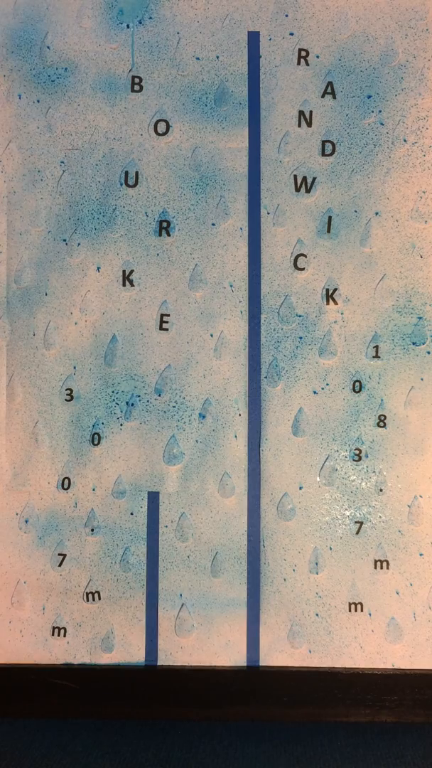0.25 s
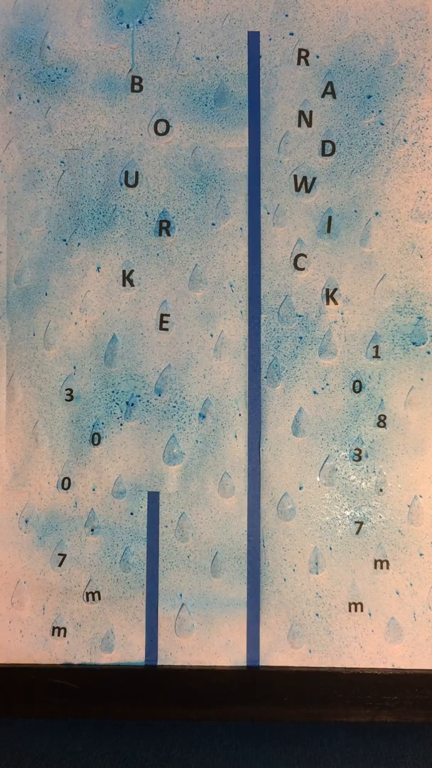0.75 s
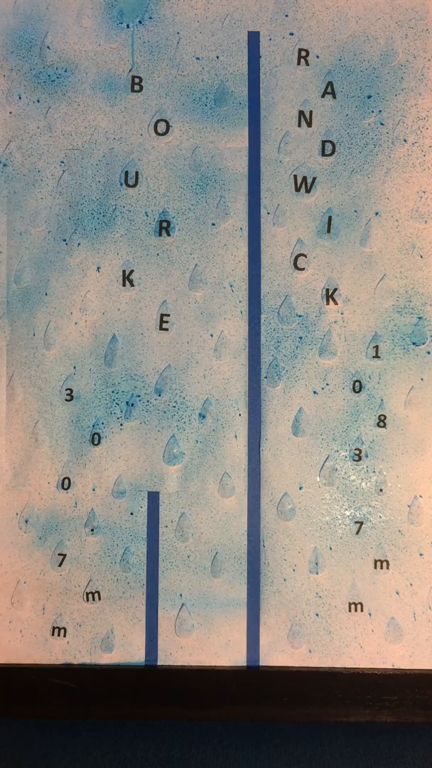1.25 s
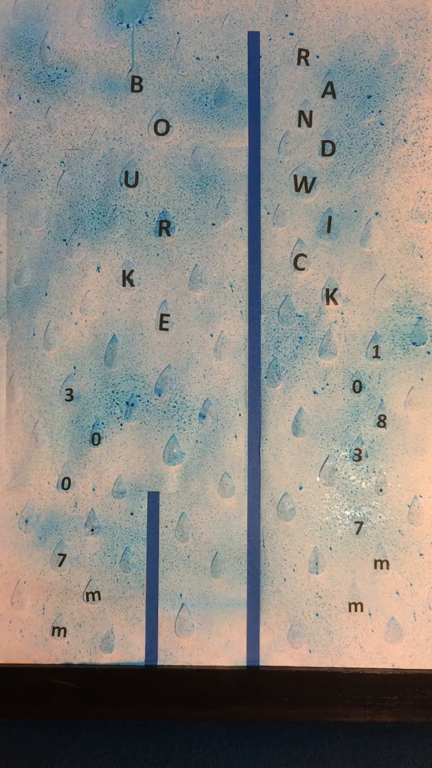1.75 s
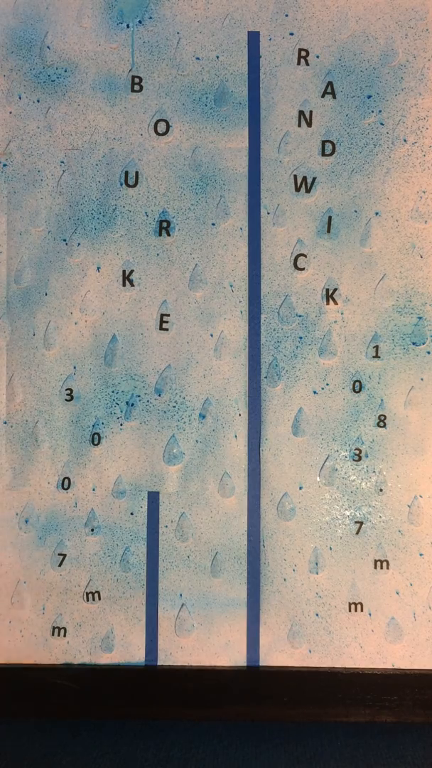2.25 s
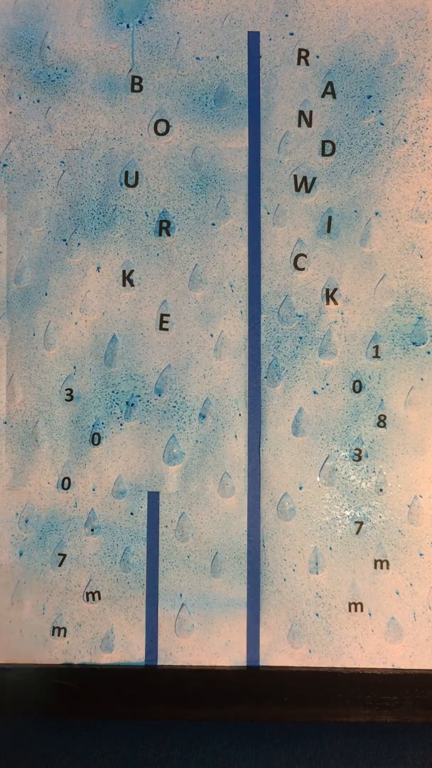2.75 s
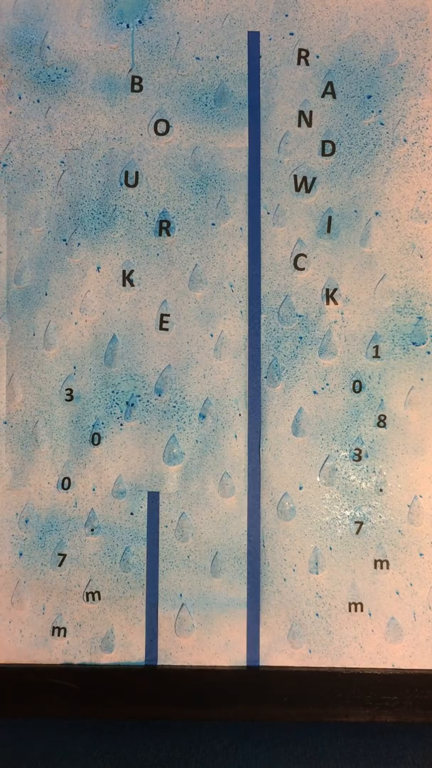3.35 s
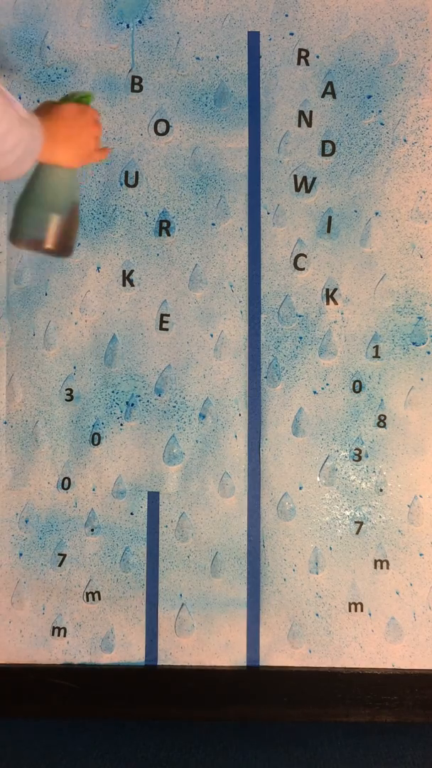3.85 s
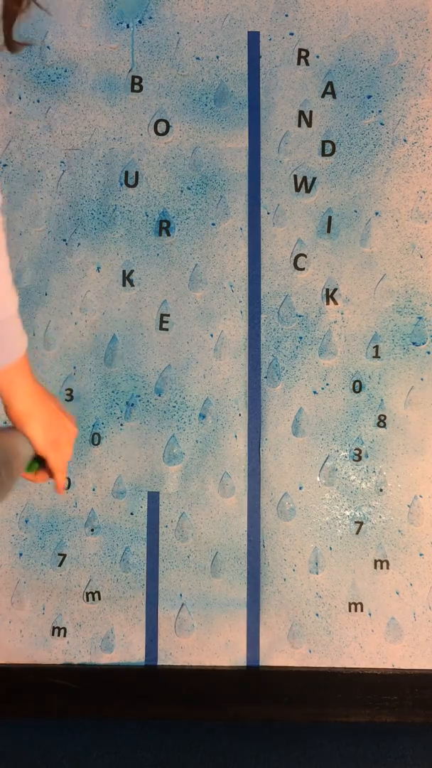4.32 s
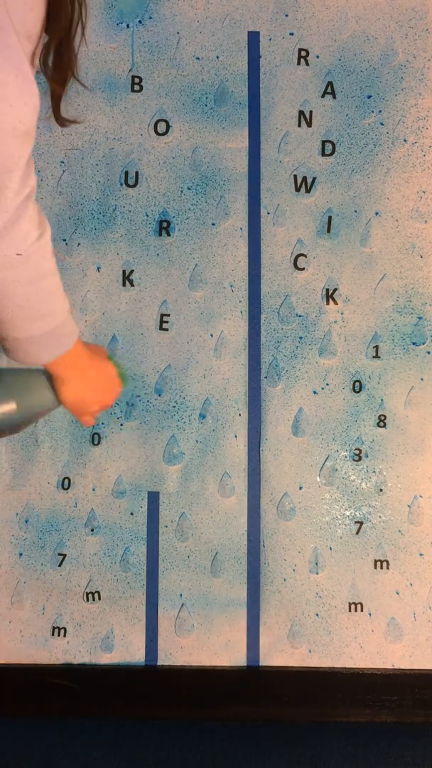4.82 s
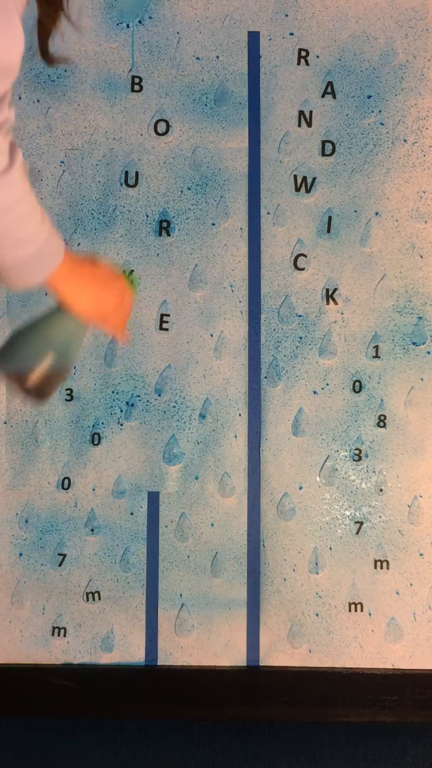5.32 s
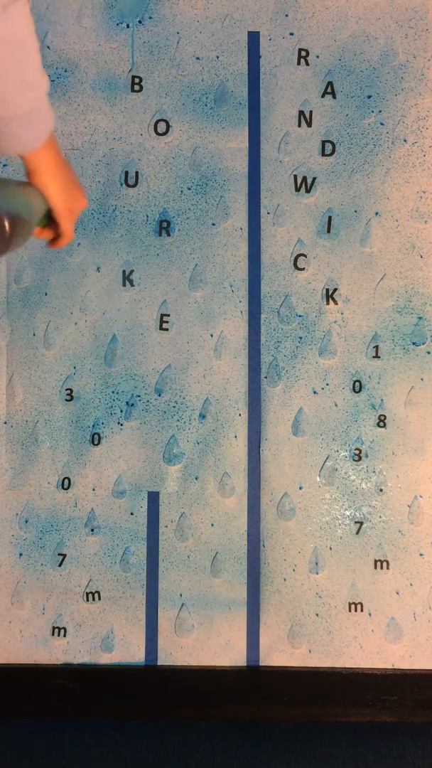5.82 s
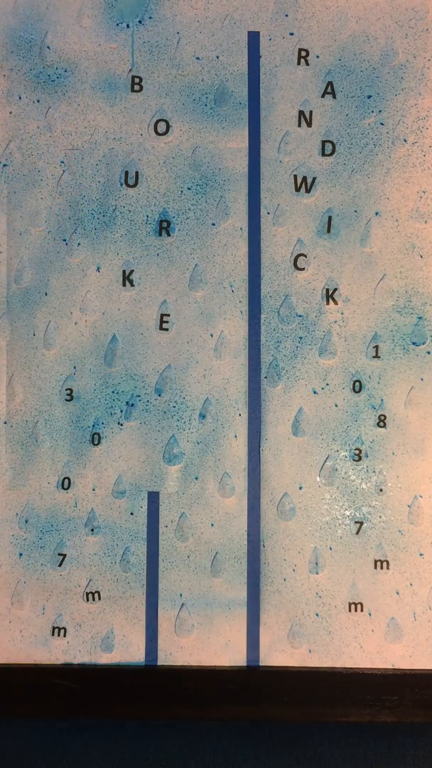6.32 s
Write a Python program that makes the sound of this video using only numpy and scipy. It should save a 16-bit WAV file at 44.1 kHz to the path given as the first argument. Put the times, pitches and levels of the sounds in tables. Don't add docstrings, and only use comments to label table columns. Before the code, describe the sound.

Eight short, unevenly spaced spray-bottle squirts hiss in a hushed room, separated by bubbly refills, trigger clacks and a rattly pause midway.

```python
import sys
import numpy as np
from scipy import signal
from scipy.io import wavfile

SR = 44100
rng = np.random.default_rng(int(sys.argv[2]) if len(sys.argv) > 2 else 0)


def wav_out(sig):
    wavfile.write(sys.argv[1], SR, np.round(np.clip(np.atleast_2d(sig).T, -1, 1) * 32767).astype(np.int16))


def rack_gain(trim_db):
    fader = np.asarray(trim_db, float)
    return 10 ** (fader / 20)


N = 289737
STEP = 40
OPEN_DB, SHUT_DB = -45.5, -45

# (valve opens t/s, fullest pressure t/s, valve shuts t/s, fullest jet level/dB,
# jump over the dribble at opening level/dB)
SQUEEZES = [
    (-0.2, -0.08, 0.004, -40, 5),
    (0.595, 0.675, 0.754, -37.5, 0.3),
    (1.283, 1.395, 1.46, -41.5, 8),
    (1.998, 2.102, 2.182, -41.5, 11),
    (2.71, 2.806, 2.872, -39, 7),
    (4.149, 4.262, 4.318, -37, 7),
    (4.984, 5.08, 5.152, -37.5, 4),
    (5.803, 5.892, 5.936, -40, 1.5),
]
# (collapse of the jet dB/s, draining froth level/dB, its fall s per 20 dB)
DRAINS = [
    (290, -60, 0.25),
    (300, -60.5, 0.6),
    (240, -58, 0.14),
    (420, -65, 0.12),
    (350, -72, 0.2),
    (430, -67, 0.3),
    (480, -60, 0.1),
    (320, -57, 0.4),
]


def squeeze():
    roundness, valve_s, dribble_db_per_s = 1.3, 0.007, 420
    t = np.arange(0, N, STEP) / SR
    level_db = -120
    for (opens, fullest, shuts, peak_db, jump_db), (die_db_per_s, *_) in zip(SQUEEZES, DRAINS):
        off = np.abs(np.interp(t, [opens, fullest, shuts], [-1, 0, 1])) ** roundness
        arch_db = peak_db + off * (np.where(t < fullest, OPEN_DB, SHUT_DB) - peak_db)
        early_s = opens - t
        leak_db = jump_db * np.clip(early_s / valve_s, 0, 1) + dribble_db_per_s * np.maximum(early_s, 0)
        collapse_db = die_db_per_s * np.maximum(t - shuts, 0)
        level_db = np.maximum(level_db, arch_db - leak_db - collapse_db)
    return level_db


def jet():
    # (f/Hz, level/dB per Hz)
    mist_colour = [(150, -51), (250, -41.5), (335, -20.5), (645, -13.5), (753, -18.5), (910, -11.5),
                   (1140, -12.5), (1530, -8), (3200, -3.5), (4930, 1.5), (9820, -1.5), (13200, -5),
                   (15400, -6.5)]
    # (f/Hz, width/Hz, level/dB)
    cavities = [(4020, 150, 3), (4900, 220, 0), (7100, 450, 1.5), (1550, 67, 2.5), (2130, 350, -0.5)]
    level_db = squeeze()
    over_db = level_db - SHUT_DB
    body_db = 7.7 - 1.1 * np.maximum(over_db, -1.5) - 0.4 * np.maximum(-56 - level_db, 0)
    patter_db = 2 - 0.8 * np.maximum(over_db, -18)
    source = rng.standard_normal((2, N)) + 0.23 * grains(per_s=5000, spread_db=0.5)
    mist = coloured(source, mist_colour, 1.2, body_db, patter_db)
    for hz, width_hz, peak_db in cavities:
        mist = mist + (rack_gain(peak_db) - 1) * resonance(mist, hz, width_hz)
    mist = mist + every_sample(rack_gain(body_db - 16.5)) * droplets(per_s=1500, cycles=20.0)
    return every_sample(rack_gain(level_db + 0.3)) * mist


def droplets(per_s, cycles):
    hits = grains(per_s, spread_db=2.5)[0]
    dealt = rng.integers(0, 16, N)
    out = 0
    for k, hz in enumerate(np.geomspace(1450, 3600, 16)):
        out = out + resonance(hits * (dealt == k) + 1e-18, hz, 1.9 * hz / cycles)
    return rms_one(out)


def spray_edges():
    # (f/Hz at the valve level, level/dB against the mist)
    edges = [(2500, -22), (3300, -21), (4100, -20), (5300, -21), (6400, -21), (7900, -23)]
    rise_per_db, wander, width_hz, spit_db = .02, .06, 260, 3.5
    level_db = squeeze()
    out = 0
    for hz, edge_db in edges:
        pitch = hz * np.exp(rise_per_db * np.maximum(level_db - SHUT_DB, -6) + wander * slow(6.0))
        phase = 2 * np.pi * np.cumsum(every_sample(pitch)) / SR
        gain = rack_gain(level_db + edge_db + spit_db * slow(22.0))
        out = out + every_sample(gain * slow(width_hz)) * np.cos(phase)
        out = out + every_sample(gain * slow(width_hz)) * np.sin(phase)
    return out


def refill():
    # (loudest t/s, level/dB, rise s per 20 dB, fall s per 20 dB, dullness/dB)
    rubs = [(0.13, -64, 0.2, 0.15, 3), (0.218, -55.5, 0.025, 0.12, 2.5), (0.53, -67.5, 0.17, 0.05, 6),
            (1.03, -63, 0.3, 0.12, 0.5), (1.25, -63, 0.11, 0.03, -4), (1.62, -66, 0.1, 0.1, 1.5),
            (1.7, -54.5, 0.12, 0.1, 0.2), (1.86, -77, 0.3, 0.2, 0.2), (1.95, -68, 0.03, 0.05, -4),
            (2.39, -62.5, 0.12, 0.2, 1.5), (3.026, -69, 0.06, 0.25, 1.5), (3.14, -68, 0.3, 0.04, 2.5),
            (3.29, -76, 0.05, 0.3, 4), (3.54, -66.5, 0.2, 0.3, 0.5), (3.8, -77, 0.4, 0.3, -4),
            (4.112, -62, 0.06, 0.1, -4), (4.4, -66, 0.1, 0.15, 0.5), (4.55, -50, 0.09, 0.09, 5.5),
            (4.68, -70, 0.03, 0.13, 0.5), (4.876, -66, 0.02, 0.4, 0.2), (5.365, -57.5, 0.12, 0.22, -2.5),
            (5.755, -63, 0.15, 0.03, -8), (6.17, -61, 0.05, 0.4, 0.2), (6.33, -60, 0.15, 0.25, 4),
            (6.44, -65, 0.3, 0.2, 8), (6.51, -65.5, 0.1, 0.12, 3)]
    # (loudest t/s, level/dB, rise s per 20 dB, fall s per 20 dB)
    shuffles = [(0.05, -66, 0.1, 0.1), (0.53, -63, 0.2, 0.1), (0.93, -65, 0.2, 0.2), (1.04, -60, 0.1, 0.2),
                (2.4, -69, 0.2, 0.2), (3.12, -70, 0.2, 0.1), (3.55, -71, 0.3, 0.2), (4.49, -63, 0.05, 0.1),
                (4.55, -53, 0.08, 0.08), (4.68, -69, 0.03, 0.1), (4.88, -66, 0.02, 0.15),
                (5.01, -59, 0.12, 0.06), (5.14, -62, 0.06, 0.06), (5.31, -68, 0.1, 0.15),
                (5.86, -64, 0.25, 0.2), (5.42, -69, 0.15, 0.2), (6.1, -66, 0.2, 0.3), (6.3, -60, 0.3, 0.3),
                (6.44, -59.5, 0.2, 0.15)]
    # (f/Hz, level/dB per Hz)
    crackle_colour = [(150, -44), (250, -7), (457, -15.5), (1310, -2.5), (1430, -1.5), (1980, -0.5),
                      (2310, -1), (5280, -1.5), (11100, -8), (15400, -15)]
    lag_s, rise_s, drain_dull_db = 0.07, 0.04, 0.1
    drains = []
    for (_, _, shuts, *_), (_, db, fall_s) in zip(SQUEEZES, DRAINS):
        drains.append((shuts + lag_s, db, rise_s, fall_s, drain_dull_db))
    rows = rubs + drains
    power = swells(rows)
    total = power.sum(axis=0)
    dull_db = np.array(rows)[:, -1] @ power / total
    low_db = 10 * np.log10(rack_gain(-14) ** 2 + swells(shuffles).sum(axis=0) / total)
    clumps = rack_gain(2.5 * drift(45))
    source = rng.standard_normal((2, N)) + 0.63 * grains(per_s=900, spread_db=1.0) * clumps
    crackle = coloured(source, crackle_colour, 1.12, dull_db, low_db + 14.5)
    return every_sample(np.sqrt(total)) * rack_gain(-1.5) * crackle


def ticks():
    # (t/s, peak level/dB, centre f/Hz)
    bubbles = [(0.153, -52, 10000), (2.3635, -52, 9500), (2.3825, -46, 6000), (2.423, -52, 10000),
               (2.43, -54, 6000), (2.438, -52, 7500), (2.4585, -53, 6000), (3.0257, -53, 8000),
               (3.06, -55, 9500), (3.134, -50, 7000), (4.8, -57, 6000), (5.329, -53, 7500),
               (5.3535, -51, 7500), (5.37, -50, 5000), (5.378, -50, 5000), (0.968, -45, 5260),
               (0.9994, -47, 10000), (1.038, -52, 4160), (1.222, -56, 5320), (1.5983, -50, 6590),
               (1.943, -46, 5450), (1.9517, -49, 5470), (2.2754, -55, 4590), (2.3242, -48, 6230),
               (2.37, -46, 8000), (2.3944, -48, 7500), (2.412, -47, 4650), (2.4672, -48.5, 4700),
               (3.0038, -45, 6200), (3.0505, -49, 9840), (3.0727, -46, 8000), (3.0857, -50, 9500),
               (3.0989, -46.5, 9670), (3.105, -51, 8000), (3.1404, -48, 10200), (4.1051, -47, 7000),
               (4.6757, -51, 4000), (4.8734, -44, 9000), (5.3095, -52, 6890), (5.4005, -47, 5120),
               (6.116, -45, 7860), (6.1719, -48, 4060), (6.2153, -44, 6800)]
    echo_s, echo_level_db = .0027, -1.5
    out, t = np.zeros(N + SR), np.arange(SR // 100) / SR
    for s, peak_db, hz in bubbles + froth(count=10):
        noise, uneven_db = rng.standard_normal(len(t)), rng.normal(0, 1.6)
        pop = resonance(noise * (np.exp(-t / 0.00015) + 0.16 * np.exp(-t / 0.0027)), hz, 1.3 * hz)
        pop = rack_gain(peak_db) * pop / np.abs(pop).max()
        for start_s, gain in ((s, 1), (s + echo_s, rack_gain(echo_level_db + uneven_db))):
            at = round(start_s * SR)
            out[at:at + len(t)] += gain * pop
    return out[:N]


def froth(count):
    # (start t/s, mean gap/s, peak level/dB, centre f/Hz)
    runs = [
        (2.358, 0.0105, -59, 6000),
        (3.03, 0.0105, -60, 6500),
    ]
    rows = []
    for start, gap_s, peak_db, hz in runs:
        gaps, sizes, pitches = rng.uniform(-1, 1, (count, 3)).T
        times = start + gap_s * np.cumsum(1 + 0.6 * gaps)
        rows += zip(times, peak_db + 5.0 * sizes, np.minimum(hz * 1.4 ** pitches, 11000))
    return rows


def knocks():
    # (t/s, peak level/dB, ring f/Hz, rattle t60/s, bright crack level/dB)
    rows = [(0.2113, -48, 1950, 0.09, -14), (0.224, -49, 2050, 0.06, -14), (0.228, -52, 3900, 0.06, -20),
            (1.6596, -47, 2450, 0.06, -6), (1.6885, -43, 2270, 0.032, -18), (1.6965, -42, 2450, 0.05, -12),
            (1.7136, -46, 2000, 0.06, -15), (1.9895, -39, 2250, 0.09, -25), (2.278, -56, 2900, 0.06, -10),
            (2.7075, -39, 2400, 0.07, -25), (3.2725, -56, 2140, 0.08, -4), (4.122, -47, 2600, 0.046, -7),
            (4.474, -51, 3200, 0.079, -25), (4.4918, -46.5, 1880, 0.053, -8),
            (4.5244, -41, 2510, 0.081, -20), (4.5304, -36, 2510, 0.05, -9), (4.5414, -39, 2010, 0.075, -17),
            (4.5579, -41, 1550, 0.053, -16), (4.5844, -53, 1900, 0.054, -13),
            (4.6745, -50, 2460, 0.03, -17), (5.3418, -46, 1950, 0.05, -25)]
    return clicks(rows, spread=.2, ring_s=0.03, ring_share=0.2, crack_hz=4000, crack_s=0.0028)


def bumps():
    # (t/s, peak level/dB, ring f/Hz, rattle t60/s, bright crack level/dB)
    rows = [(1.662, -52, 1480, 0.1, -30), (1.86, -60, 935, 0.092, -30), (4.481, -49.5, 700, 0.078, -30),
            (4.552, -49, 1330, 0.1, -30), (4.876, -53.5, 1230, 0.092, -28), (4.955, -52.5, 1220, 0.21, -30),
            (4.985, -51, 950, 0.2, -30), (5.015, -49, 900, 0.12, -30), (5.13, -52, 900, 0.12, -30),
            (6.41, -54, 850, 0.15, -30), (5.341, -54, 1530, 0.06, -30), (5.357, -50, 1390, 0.06, -30)]
    return clicks(rows, spread=0.14, ring_s=0.068, ring_share=0.68, crack_hz=2000, crack_s=.003)


def pings():
    # (t/s, peak level/dB, ring f/Hz, rattle t60/s, bright crack level/dB)
    rows = [
        (1.04, -52.5, 4290, 0.04, -10),
        (1.2216, -57, 5250, 0.028, -7),
        (3.2723, -53, 5220, 0.04, -14),
        (4.466, -58, 5100, 0.061, -4),
        (4.5, -48, 5400, 0.03, -10),
    ]
    return clicks(rows, spread=0.05, ring_s=0.08, ring_share=0.6, crack_hz=6000, crack_s=0.0014)


def clicks(rows, spread, ring_s, ring_share, crack_hz, crack_s):
    out, t = np.zeros(N + SR), np.arange(SR // 6) / SR
    bright = signal.butter(2, [crack_hz, 11000], "band", fs=SR, output="sos")
    for s, peak_db, hz, t60, crack_db in rows:
        noise, detune = rng.standard_normal((2, len(t))), rng.normal([-1.02, -0.23, 0.3, 1], 0.17)
        rattle = noise[0] * rack_gain(-60 * t / max(t60, .004)) * (1 - np.exp(-t / 0.00087))
        ring = resonance(resonance(rattle, hz, spread * hz), hz, 2 * spread * hz)
        for d in detune:
            ring = ring + 0.35 * resonance(rattle, hz * (1 + 3.0 * spread) ** d, spread * hz)
        ring = ring + ring_share * resonance(rattle, hz * 1.01, np.log(1000) / np.pi / ring_s)
        crack = signal.sosfilt(bright, noise[1]) * np.exp(-t / crack_s) * rack_gain(crack_db) / 1.3
        at = round(s * SR)
        out[at:at + len(t)] += rack_gain(peak_db) * (ring / np.abs(ring).max() + crack)
    return out[:N]


def snaps():
    # (t/s, peak level/dB, f/Hz, t60/s)
    strikes = [(1.0385, -53, 5600, .012), (1.041, -48, 4250, .02), (1.054, -54, 4700, .012),
               (1.2215, -53, 5350, .016), (1.651, -58, 7200, .01), (1.6605, -46, 1500, .03),
               (1.664, -45, 2300, .015), (1.672, -48, 1500, .025), (1.6905, -44, 2050, .02),
               (1.694, -38.5, 2700, .025), (1.6945, -47, 4000, .015), (1.6985, -38.5, 2620, .025),
               (1.7005, -46, 4000, .02), (1.7035, -41, 2450, .02), (1.711, -43, 2600, .03),
               (1.721, -51, 2750, .02), (3.2698, -58, 9500, .01), (3.2728, -46, 5250, .016),
               (3.2762, -50, 5300, .025), (3.276, -60, 1700, .02), (4.1065, -54, 10500, .012),
               (4.1225, -47, 3900, .025), (4.4578, -54, 5890, .025), (4.467, -52, 5100, .035),
               (4.482, -54, 8000, .008), (4.4892, -47, 4000, .02), (4.494, -48, 3900, .02),
               (4.527, -44, 4500, .015), (4.5312, -31, 2400, .026), (4.5312, -40, 7300, .01),
               (4.533, -37, 5600, .014), (4.5352, -37, 4900, .016), (4.5432, -39, 2300, .015),
               (4.546, -48, 5900, .02), (4.551, -40, 2900, .014), (4.556, -42, 2200, .015),
               (4.562, -43, 1500, .02), (4.568, -44, 4000, .02), (4.574, -44, 1900, .015),
               (4.581, -46, 3300, .008), (4.601, -55, 5600, .02), (6.301, -53, 1300, .015),
               (6.325, -51, 900, .015), (6.364, -49, 2200, .012), (6.424, -50, 1100, .012),
               (6.429, -52, 2100, .012), (6.443, -52, 900, .03), (6.466, -54, 2700, .015),
               (6.517, -56, 4500, .008)]
    contact_s, grit_s, grit_share = .0003, .0012, .7
    twin, twin_db, distance_db = 1.13, -8, -4
    out, t = np.zeros(N + SR), np.arange(SR // 20) / SR
    for s, peak_db, hz, t60 in strikes:
        fade = rack_gain(-60 * t / max(t60, .003)) * (1 - np.exp(-t / contact_s))
        first, second = rng.random(2)
        ring = np.sin(2 * np.pi * (hz * t + first))
        ring = ring + rack_gain(twin_db) * np.sin(2 * np.pi * (twin * hz * t + second))
        grit = rms_one(resonance(rng.standard_normal(len(t)), hz, 1.2 * hz)) * np.exp(-t / grit_s)
        at = round(s * SR)
        out[at:at + len(t)] += rack_gain(peak_db + distance_db) * (fade * ring / fade.max() + grit_share * grit)
    return out[:N]


def booms():
    # (t/s, peak level/dB, f/Hz, t60/s)
    rows = [
        (4.519, -55, 290, 0.2),
        (4.888, -52, 315, 0.16),
    ]
    t = np.arange(N) / SR
    out = np.zeros(N)
    for s, peak_db, hz, t60 in rows:
        age = np.maximum(t - s, 0)
        wobble = 2 * np.pi * hz * age + .8 * drift(9.7)
        out += rack_gain(peak_db + 1.0 - 60 * age / t60) * (1 - np.exp(-age / 0.026)) * np.sin(wobble)
    return out


def vent_whine():
    # (start t/s, end t/s, start level/dB, end level/dB, f/Hz)
    whines = [
        (1.05, 1.27, -73, -69, 1455),
        (1.52, 1.66, -71, -69, 1375),
        (3.35, 3.62, -77, -79, 1360),
        (3.655, 3.685, -76, -80, 1360),
        (3.76, 3.9, -80, -80, 1445),
    ]
    tables = [[(a, db, hz), (b, end_db, hz)] for a, b, db, end_db, hz in whines]
    return gliding_band(tables, width_hz=100)


def glug():
    # (t/s, level/dB, f/Hz)
    path = [
        (.95, -96, 258),
        (1.05, -74, 362),
        (1.15, -75, 450),
        (1.3, -75, 493),
        (1.4, -90, 516),
    ]
    return gliding_band([path], width_hz=46)


def gliding_band(tables, width_hz):
    t = np.arange(N) / SR
    s, *columns = np.transpose(np.vstack(tables))
    level_db, hz = [np.interp(t, s, c) for c in columns]
    gate = sum(np.clip(np.minimum(t - r[0][0], r[-1][0] - t) / .012 + .5, 0, 1) for r in tables)
    gain = np.sqrt(np.clip(gate, 0, 1)) * rack_gain(level_db - 1.5 + 1.5 * drift(25))
    phase = 2 * np.pi * np.cumsum(hz) / SR
    return gain * (drift(width_hz) * np.cos(phase) + drift(width_hz) * np.sin(phase))


def room(x):
    t60_s, level_db = 0.23, -15
    t = np.arange(SR // 2) / SR
    dull_noise = signal.lfilter([.5], [1, -.5], rng.standard_normal(len(t)))
    tail = dull_noise * rack_gain(-60 * t / t60_s) * (t > .006)
    return rack_gain(level_db) * signal.fftconvolve(x, tail / np.sqrt(np.sum(tail ** 2)))[:N]


def far_machinery():
    # (t/s, level/dB)
    load = [(0.0, -71), (0.2, -82), (0.73, -70), (1.9, -82), (1.94, -71), (2.84, -82), (4.35, -74),
            (4.39, -84), (4.59, -73), (5.2, -77), (5.27, -89), (5.36, -76), (6.51, -75), (6.57, -89)]
    # (f/Hz, width/Hz)
    tones = [(54, 12), (91, 4.7), (137, 7)]
    means = [-78, -78.5, -78]
    shares = [0.1, 0.1, 0.9]
    load_db = np.interp(np.arange(N) / SR, *np.transpose(load))
    out = np.zeros(N)
    for (hz, width_hz), mean_db, share in zip(tones, means, shares):
        level_db = mean_db + share * (load_db - load_db.mean()) + 3.0 * drift(4.0)
        phase = 2 * np.pi * np.cumsum(hz + .6 * width_hz * drift(6.02)) / SR
        out += rack_gain(level_db + 1.5 + 1.6 * drift(6.2)) * np.sin(phase)
    return out


def room_hush():
    # (f/Hz, level/dB per Hz)
    hush_colour = [(15, -38), (25, -5.5), (66, -1.5), (113, 0), (220, -4.5), (612, -11.5), (800, -13.5),
                   (1520, -14.5), (2680, -19), (4010, -21.5), (9480, -21), (14200, -23.5), (15400, -31)]
    hush = rms_one(coloured(rng.standard_normal((2, N)), hush_colour, 1.0))
    bass_cut = signal.butter(3, 44, "highpass", fs=SR, output="sos")
    return rack_gain(-69.5) * signal.sosfilt(bass_cut, hush)


def coloured(source, spectrum, patchy_db, body_db=0, low_db=0):
    edges = 25 * 2 ** np.arange(0, 9.5, 1 / 3)
    out, top_power, together = 0, 0, slow(16.8)
    for k, (low, high) in enumerate(zip(edges, edges[1:])):
        hz = np.sqrt(low * high)
        if hz < spectrum[0][0] * .8:
            continue
        band = signal.sosfilt(signal.butter(2, [low, high], "band", fs=SR, output="sos"), source[k % 2])
        band = band * rack_gain(at_hz(spectrum, hz))
        top_power += np.mean(band ** 2) * (hz > 3500)
        share_low = at_hz([(800, 1), (1200, 0)], hz)
        share_top = at_hz([(2600, 0), (4400, 1)], hz)
        tilt_db = share_low * low_db + (1 - share_low - share_top) * body_db
        out = out + band * every_sample(rack_gain(tilt_db + patchy_db * (0.47 * together + slow(12))))
    return out / np.sqrt(top_power)


def grains(per_s, spread_db):
    sizes = rack_gain(spread_db * np.minimum(rng.exponential(1, (2, N)), 4)) * rng.choice([-1, 1], (2, N))
    return rms_one(sizes * (rng.random((2, N)) < per_s / SR))


def resonance(x, hz, width_hz):
    r = np.exp(-np.pi * width_hz / SR)
    poles = [1, -2 * r * np.cos(2 * np.pi * hz / SR), r * r]
    return signal.lfilter(np.array([1, 0, -1]) * (1 - r * r) / 2, poles, x)


def swells(rows):
    t = np.arange(0, N, STEP) / SR
    s, level_db, rise_s, fall_s = np.array(rows)[:, :4].T[:, :, None]
    away = np.maximum((s - t) / rise_s, (t - s) / fall_s)
    return rack_gain(level_db - 20 * np.minimum(away, 10)) ** 2


def slow(rate):
    r = np.exp(-2 * STEP * np.pi * rate / SR)
    noise = rng.standard_normal(N // STEP + 2001)
    return rms_one(signal.lfilter([1], [1, -2 * r, r * r], noise)[2000:])


def every_sample(control):
    return np.interp(np.arange(N) / STEP, np.arange(len(control)), control)


def drift(rate):
    return every_sample(slow(rate))


def at_hz(points, hz):
    f, db = np.transpose(points)
    return np.interp(np.log(hz), np.log(f), db)


def rms_one(x):
    return x / np.sqrt(np.mean(x ** 2) + 1e-20)


def scene():
    bottle = jet() + spray_edges() + ticks() + knocks() + bumps() + pings() + snaps()
    air = booms() + vent_whine() + glug()
    background = far_machinery() + room_hush()
    return (bottle + room(bottle) + air + refill() + background)[None]


def roll_off(x):
    return signal.sosfilt(signal.butter(12, 15400, fs=SR, output="sos"), x)


def record(dry):
    top_cut = signal.cheby2(10, 50, 16000, fs=SR, output="sos")
    return roll_off(signal.sosfilt(top_cut, dry))


dry = scene()
out = record(dry)
wav_out(out)
```